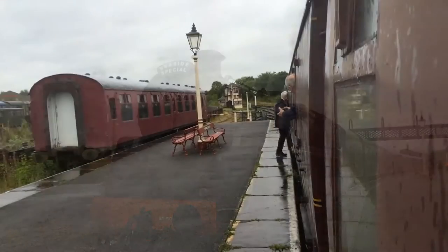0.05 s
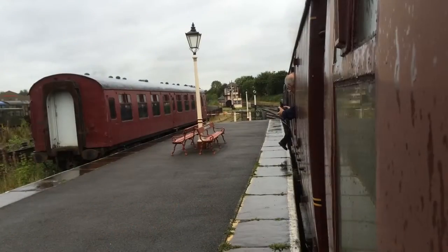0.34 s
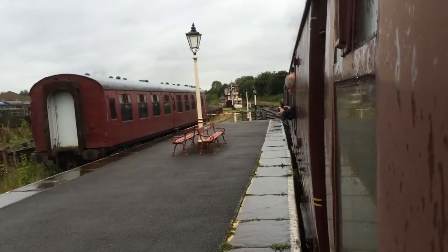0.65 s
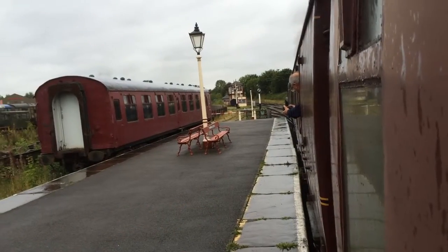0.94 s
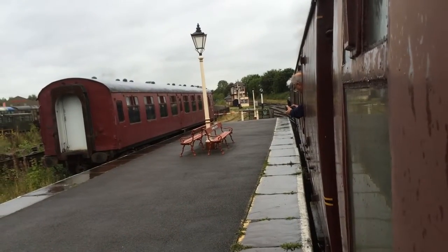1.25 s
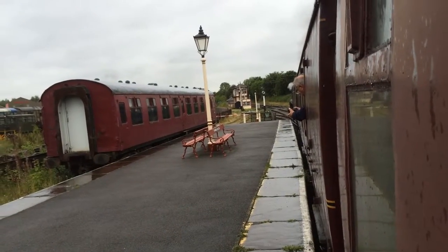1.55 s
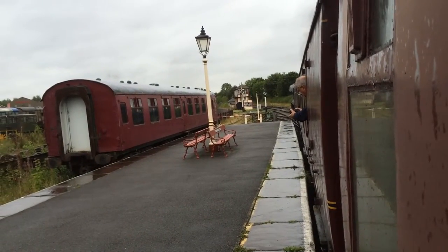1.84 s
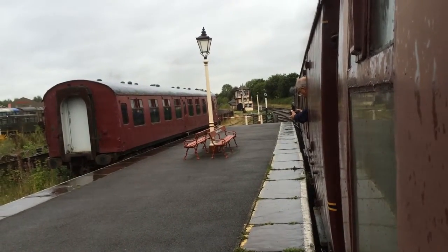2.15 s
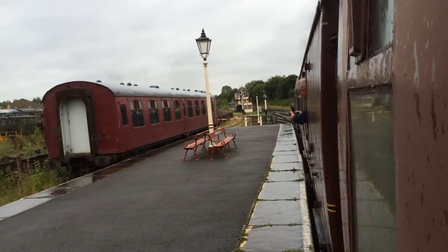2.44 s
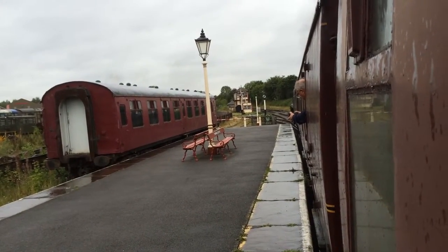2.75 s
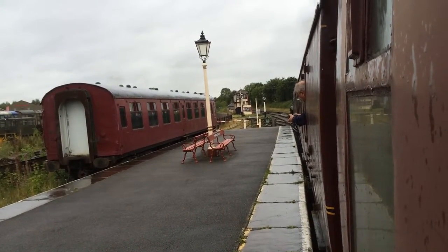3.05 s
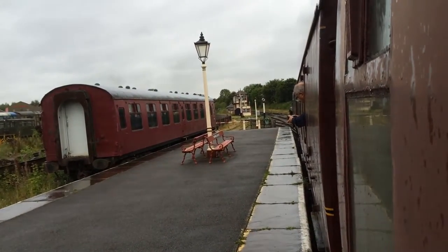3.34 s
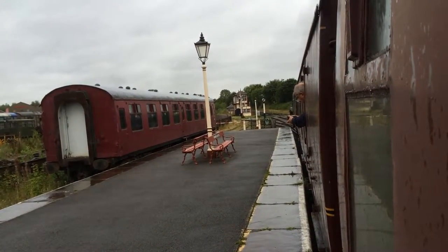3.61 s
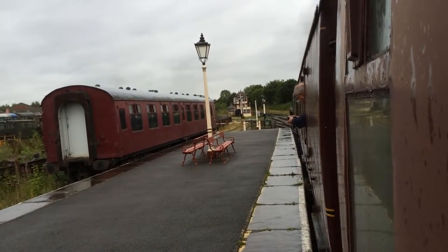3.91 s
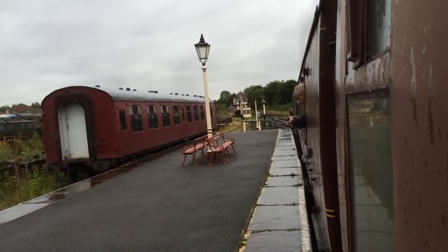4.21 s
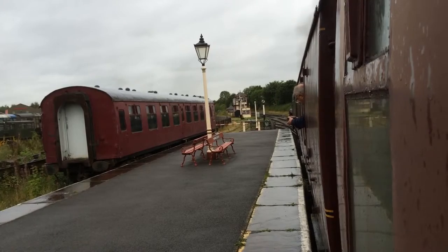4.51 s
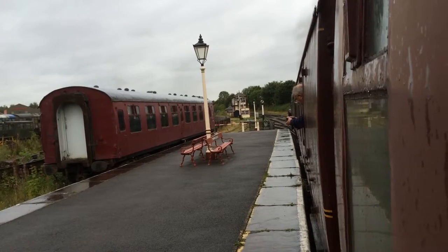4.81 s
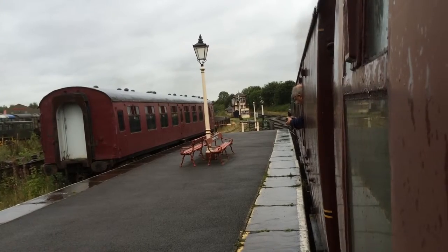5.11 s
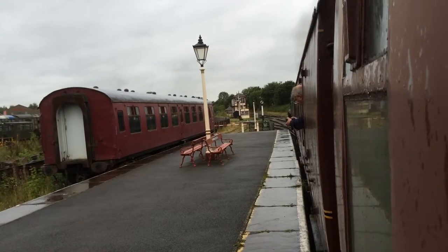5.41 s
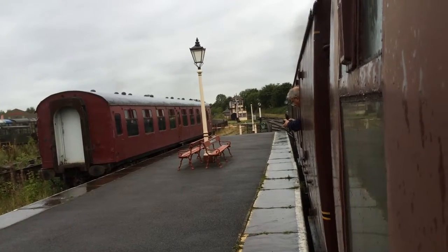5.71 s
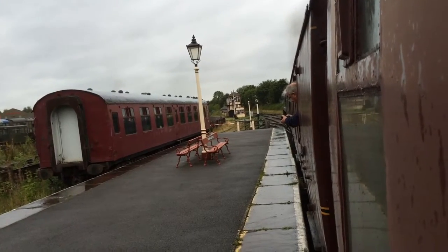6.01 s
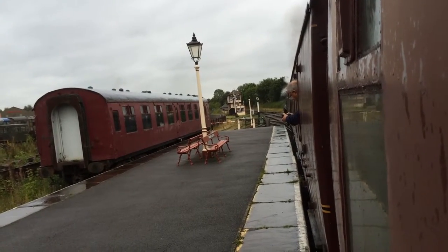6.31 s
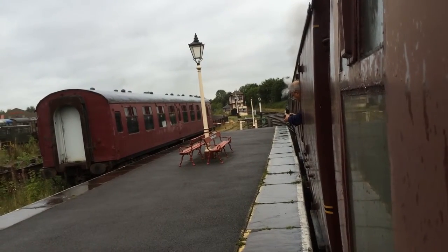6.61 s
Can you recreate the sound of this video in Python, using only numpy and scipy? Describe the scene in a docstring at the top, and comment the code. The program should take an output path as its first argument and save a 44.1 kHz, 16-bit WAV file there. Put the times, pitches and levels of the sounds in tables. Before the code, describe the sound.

A steam locomotive roars and hisses close by, cutting off abruptly at about 0.3 seconds. A quieter, more distant engine remains, with a soft hollow roar and a steady hiss of leaking steam that carries faint, thin singing tones. At about 0.8 seconds comes the loudest sound, one short steam whistle that rises in pitch, turns harsher and stops at 1.2 seconds. It echoes around the yard and fades over the next second or two. Two faint whistling notes follow at about 2.3 and 2.9 seconds. Wind bumps the microphone with dull thuds near 2.8 and 4.3 seconds, and more strongly at 5 seconds. At about 5.2 seconds the engine's drain valves open and steam blasts out in a loud hiss, swelling at 6 seconds and continuing to the end, just short of 7 seconds. Everything is heard in mono from the platform.

```python
"""A steam locomotive roars close by for a moment, then stands far off at the end of its train.
Its blower rings the chimney; leaking steam hisses and sings. One short whistle rises, overblows as
pressure builds, and echoes round the yard. Wind thumps the microphone a few times. Last, the cylinder
drain cocks open: steam blasts through their pipes in a long, loud hiss. Mono, from the platform."""
import sys
import numpy as np
from scipy import signal
from scipy.fft import rfft, irfft, next_fast_len
from scipy.io import wavfile
from scipy.ndimage import uniform_filter1d, minimum_filter1d, map_coordinates

SR = 44100
rng = np.random.default_rng(int(sys.argv[2]) if len(sys.argv) > 2 else 0)


def file_out(sig):
    """Save sig as 16-bit WAV at sys.argv[1]."""
    # one column per channel
    cols = np.atleast_2d(sig).T
    # limit, then scale
    lim = np.clip(cols, -1, 1)
    pcm = np.round(lim * 32767).astype(np.int16)
    wavfile.write(sys.argv[1], SR, pcm)


N = 293706
TIME_S = np.arange(N) / SR
FREQS_HZ = np.maximum(np.fft.rfftfreq(N, 1 / SR), 1)

# whistle's first, second, higher modes: level before swell/dB, level overblown/dB
WHISTLE_REGISTERS = [(-6.5, -10.5), (-38, -21), (-39.5, -22.5)]
# higher modes: harmonic number, relative level/dB, breathiness/0-1
WHISTLE_OVERTONES = [(3, -1.5, 0.07), (4, -13.5, 0.6), (5, -12.5, 0.6), (6, -19, .85)]
# whistle's steam noise: f/Hz, level/dB
BREATH_SPECTRUM = [(400, -37), (750, -2), (1100, -1.5), (1700, -15), (3000, -16), (8000, -26)]
# steam through the shut whistle: t/s, half length/s, peak f/Hz, level/dB
WHISTLE_TRICKLES = [(2.251, 0.127, 1720, -35.5), (2.948, 0.059, 1670, -39.5)]
# reflections off carriages; off buildings and wooded hill: delay/s, level/dB
CARRIAGE_ECHOES = [(.046, -8), (.075, -11)]
YARD_ECHOES = [(.085, -12.5), (0.229, -19), (.33, -22), (.555, -20), (.83, -35.5)]
# noise of drain cocks, close engine, leak, yard: f/Hz, relative density/dB
COCK_SPECTRUM = [(180, -25), (300, -16), (390, -66), (452, -10.5), (515, -21), (568, -11), (855, -17.5),
                 (1090, -10.5), (1590, -5.5), (1970, -4.5), (2280, -5.5), (3550, -3), (9960, -11.5),
                 (12900, -16.5), (15000, -27)]
CLOSE_SPECTRUM = [(18, -47), (30, -9), (113, -18), (195, -7), (312, -7), (645, -14), (774, -7),
                  (1090, -10.5), (1240, 0), (1440, -15), (2130, -8.5), (2430, -16), (3590, -9),
                  (15000, -16)]
LEAK_SPECTRUM = [(400, -17.5), (650, -7), (1000, -6), (1500, 4), (2300, -3.5), (3400, 0.5), (5500, 3),
                 (6200, 2), (7200, 2), (8700, 2), (10500, -2.5), (12500, -2), (13500, -7.5), (15500, -13)]
YARD_SPECTRUM = [(20, -28), (40, -12), (62, 0), (110, -4), (250, -15), (450, -6.5), (700, -19),
                 (2000, -28.5)]
# resonances of drain pipes, close engine, chimney: f/Hz, nominal width/Hz, level/dB
DRAIN_PIPE_MODES = [(569, 20, 0), (733, 126, -4), (972, 40, -0.5), (1122, 110, 4), (1360, 99, -1),
                    (1873, 18, 11.5), (1940, 31, 7), (2047, 46, 7), (2570, 19, 4), (2630, 22, -14),
                    (2685, 15, 10.5), (3520, 30, 2), (3960, 16, 5)]
CLOSE_ENGINE_MODES = [(201.5, 35, 3), (803, 65, -3), (1265, 100, 3), (1725, 66, -3.5), (2150, 61, -3),
                      (3560, 140, -13)]
CHIMNEY_MODES = [(197, 48.4, 3), (335.7, 47, -5.5), (786, 41, -4), (971, 78, -3), (1274, 100, 5),
                 (1707, 73, -2.5)]
# narrow peaks colouring the leak's hiss, as from a nearby reflection: f/Hz, nominal width/Hz, level/dB
HISS_PEAKS = [(2570, 46, -6), (2848, 41, 4), (3174, 51, 3), (3546, 170, 1.5), (3930, 27, 0.5),
              (4293, 49, 5), (4540, 25, 7.5), (4914, 76, 9), (5080, 47, 4), (6870, 69, 3), (8800, 240, -3),
              (12070, 610, -5)]
# singing of the leak: t/s, length/s, starting f/Hz, glide/(Hz/s), level/dB
LEAK_JET_SPELLS = [(.03, 0.86, 4980, -0.5, -43), (1.299, 2, 7490, 259, -38), (2.601, 2.7, 5010, 85, -39),
                   (4.35, .85, 7600, 0, -43)]
# wind eddies: t/s, level/dB, rise/s, decay/s, centre f/Hz
WIND_EDDIES = [(2.785, -27.5, 0.028, 0.029, 58.7), (2.85, -34.5, 0.052, 0.065, 100),
               (4.32, -34, 0.082, .11, 106), (5.015, -23, 0.024, 0.048, 100),
               (5.044, -20, .008, 0.025, 117), (5.19, -34, 0.073, 0.072, 85)]


def whistle(open_s=0.837, shut_s=1.187, half_pressure_s=0.095, low_hz=785, full_hz=860):
    """Pressure sharpens and overblows the bell; it sags and spits on shutting. Returns near, carried."""
    swell_db, flutter_db = 16, 2
    overblow_pressure, overblow_width, jump_share = 0.443, 0.042, 0.21
    filling = (np.maximum(TIME_S - open_s, 0) / half_pressure_s) ** 3.51
    pressure = filling / (1 + filling) * dying(shut_s, decay_s=0.025)
    sounding = ramp(open_s, length_s=0.0194) * dying(shut_s + 0.016, decay_s=0.016)
    overblown = 0.5 + 0.5 * np.tanh((pressure - overblow_pressure) / (2 * overblow_width))
    hz = low_hz + (full_hz - low_hz) * ((1 - jump_share) * pressure + jump_share * overblown)
    # overblown modes compete and flutter
    first_db, second_db, higher_db = (
        (1 - overblown) * (soft_db + swell_db * pressure)
        + overblown * (hard_db + flutter_db * walk(44.96))
        for soft_db, hard_db in WHISTLE_REGISTERS)
    phase = 2 * np.pi * np.cumsum(hz * (1 + 0.003 * overblown * walk(140))) / SR
    tone = undb(first_db) * np.sin(phase) + undb(second_db + 2.5 * walk(108.6)) * np.sin(2 * phase)
    for k, db, breath in WHISTLE_OVERTONES:
        pure = np.sqrt(1 - breath ** 2) * np.sin(k * phase)
        breathy = breath * band(k * hz, width_hz=110) / np.sqrt(2)
        tone += undb(higher_db + db + 1.2 * walk(90)) * (pure + breathy)
    steam = undb(-22.5) * pressure * rush(BREATH_SPECTRUM)
    spit = undb(-22.5) * pulse(1.191, half_s=0.0083) * np.sin(2 * np.pi * 3440 * TIME_S)
    near = sounding * (np.sqrt(2) * tone + steam) + spit
    held = uniform_filter1d(pressure ** 4, size=1300)  # broad, distant faces blur the note's ends
    fading = undb(-16 + 5.9 * walk(50.06))  # moving air: overtones come and go
    carried = undb(-1.5) * held * (np.sin(phase) + fading * (np.sin(2 * phase) + np.sin(3 * phase)))
    return near, carried


def whistle_echoes(near, carried, t60_s=3, build_s=0.18, wet_db=-21):
    """Carriages answer at once; buildings and hill return the carried note over a scattered tail."""
    tail = rng.standard_normal(N) * undb(-60 * TIME_S / t60_s) * np.minimum(TIME_S / build_s, 1)
    scattered = signal.fftconvolve(carried, tail / np.sqrt(np.sum(tail ** 2)))[:N]
    early = sum(undb(db) * delay(near, s) for s, db in CARRIAGE_ECHOES)
    late = sum(undb(db) * delay(carried, s) for s, db in YARD_ECHOES)
    return early + late + undb(wet_db) * scattered


def whistle_trickles(sag_hz=50):
    """Leaking steam sounds the shut whistle's second mode, sharpest at peak flow."""
    out = np.zeros(N)
    for at_s, half_s, peak_hz, db in WHISTLE_TRICKLES:
        flow = pulse(at_s, half_s)
        hz = peak_hz - sag_hz * (1 - flow)
        phase = 2 * np.pi * np.cumsum(hz * (1 + 0.0045 * walk(80))) / SR
        out += np.sqrt(2) * flow * undb(db + 2.4 * walk(41.5)) * np.sin(phase)
    return out


def drain_cocks(open_s=5.243, surge_s=5.99, hiss_db=-21, roar_db=-29.5):
    """The pipes hoot as they clear; steam blasts through and surges once as pressure rises."""
    opening = ramp(open_s, length_s=0.062)
    surge = ramp(surge_s, length_s=0.2)
    hiss = undb(hiss_db + 1.7 * surge + 0.24 * walk(30)) * rush(COCK_SPECTRUM)
    roar = undb(roar_db + 4.5 * surge + 1.1 * walk(12)) * ring(DRAIN_PIPE_MODES)
    hoot = undb(-31) * pulse(5.256, half_s=0.013) * np.sin(2 * np.pi * 578 * TIME_S)
    return opening * (shimmer(hiss, depth_db=1.9, span_s=0.2943, span_hz=110.9) + roar) + hoot


def close_engine(end_s=0.267, fade_s=0.0063):
    """Blower roar from close by, with a short steam squeal; ends abruptly."""
    fade = np.clip((end_s - TIME_S) / fade_s + 0.5, 0, 1)
    squeal = undb(-29) * pulse(0.165, half_s=0.035) * band(np.full(N, 2155.), width_hz=14)
    return fade * (undb(-23.5) * rush(CLOSE_SPECTRUM) + undb(-24.5) * ring(CLOSE_ENGINE_MODES) + squeal)


def blower(level_db=-34.5):
    """The blower's turbulence rings chimney and smokebox."""
    return undb(level_db + 0.8 * walk(7.1)) * ring(CHIMNEY_MODES)


def steam_leak(level_db=-31.5, ease_s=2.84, ease_db=-1.23):
    """Escaping steam sputters and hisses, coloured by narrow peaks; it eases once."""
    flow = undb(level_db + ease_db * ramp(ease_s, length_s=0.78) + 0.6 * walk(90))
    hiss = flow * (rush(LEAK_SPECTRUM) + undb(-6) * ring(HISS_PEAKS))
    return shimmer(hiss + leak_jet(), depth_db=1.5, span_s=0.495, span_hz=130.2)


def leak_jet(rise_s=0.13, fall_s=0.21):
    """The leak sings in spells: one band each, swelling, gliding, fading."""
    out = np.zeros(N)
    for at_s, length_s, hz, glide_hz_per_s, db in LEAK_JET_SPELLS:
        envelope = undb(db + walk(24.97)) * ramp(at_s, rise_s) * dying(at_s + length_s, fall_s)
        out += envelope * band(hz + glide_hz_per_s * (TIME_S - at_s), width_hz=190)
    return out


def wind_buffets(q=2.6, low_hz=30, top_hz=520):
    """Each eddy swells and dies as a dull thud."""
    out = np.zeros(N)
    rolloff = (1 + (FREQS_HZ / top_hz) ** 2) * (1 + (low_hz / FREQS_HZ) ** 2)
    for at_s, db, rise_s, decay_s, hz in WIND_EDDIES:
        swell = np.exp(-np.maximum((at_s - TIME_S) / rise_s, 0) ** 2) * dying(at_s, decay_s)
        colour = 1 / np.hypot(1, q * (FREQS_HZ / hz - hz / FREQS_HZ))
        out += undb(db) * swell * noise(colour / rolloff)
    return out


def yard_rumble(level_db=-47):
    """Faint, wavering low background."""
    return undb(level_db + 1.5 * walk(4.84)) * rush(YARD_SPECTRUM)


def shimmer(x, depth_db, span_s, span_hz):
    """Moving air swells and fades narrow strips of a hiss independently."""
    f_hz, t_s, spectra = signal.stft(x, SR, nperseg=1024)
    field = rng.standard_normal((256, 256))
    grid = np.meshgrid(f_hz / span_hz, t_s / span_s, indexing="ij")
    strips = map_coordinates(field, grid, order=2, mode="wrap")
    return signal.istft(spectra * undb(depth_db * strips), SR)[1][:N]


def rush(spectrum):
    """Turbulence with a smooth spectrum."""
    hz, db = np.transpose(spectrum)
    return noise(undb(np.interp(np.log(FREQS_HZ), np.log(hz), db)))


def ring(peaks):
    """Turbulence with steep-sided spectral peaks."""
    return noise(sum(undb(db) / (1 + ((FREQS_HZ / hz - hz / FREQS_HZ) * hz / width * 0.95) ** 2)
                     for hz, width, db in peaks))


def band(hz, width_hz):
    """Narrow noise round a moving centre."""
    lowpass = 1 / (1 + (FREQS_HZ / width_hz) ** 2)
    phase = 2 * np.pi * np.cumsum(hz) / SR
    return noise(lowpass) * np.cos(phase) + noise(lowpass) * np.sin(phase)


def noise(gain):
    """Noise shaped by gain over FREQS_HZ; rms 1."""
    size = next_fast_len(N, True)
    gain = np.interp(np.fft.rfftfreq(size, 1 / SR), FREQS_HZ, gain)
    x = irfft(rfft(rng.standard_normal(size)) * gain, size)[:N]
    return x / np.sqrt(np.mean(x ** 2))


def walk(rate_hz):
    """Random steps, smoothed twice; spread near 1."""
    hold = int(SR / rate_hz)
    steps = np.repeat(rng.standard_normal(N // 20)[:N // hold + 1], hold)
    return 1.52 * uniform_filter1d(uniform_filter1d(steps, hold), hold)[:N]


def ramp(start_s, length_s):
    """Linear rise from 0, holding at 1."""
    return np.clip((TIME_S - start_s) / length_s, 0, 1)


def dying(end_s, decay_s):
    """1 until end_s, then exponential decay."""
    return np.exp(-np.maximum(TIME_S - end_s, 0) / decay_s)


def pulse(at_s, half_s):
    """Gaussian swell, peak 1."""
    return np.exp(-((TIME_S - at_s) / half_s) ** 2)


def delay(x, delay_s):
    """The same sound, later."""
    return np.interp(TIME_S - delay_s, TIME_S, x, left=0)


def undb(db):
    """Decibels to gain."""
    return 10 ** (np.asarray(db) / 20)


def gain_control(x, threshold_db=-11, slope=0.62, hold_s=0.24, release_s=0.11):
    """Loud sound cuts the gain at once; it holds, then recovers."""
    level_db = 10 * np.log10(np.maximum(uniform_filter1d(x[0] ** 2, size=400), 1e-12))
    cut_db = np.minimum(threshold_db - level_db, 0) * slope
    half = int(hold_s * SR / 2)
    held_db = minimum_filter1d(cut_db, 2 * half + 1, origin=half)
    pole = np.exp(-1 / (release_s * SR))
    released_db = signal.lfilter([1 - pole], [1, -pole], held_db)
    return x * undb(np.minimum(held_db, released_db))


def scene():
    """All sources straight ahead; identical channels."""
    near, carried = whistle()
    mix = near + whistle_echoes(near, carried) + whistle_trickles()
    mix += blower() + steam_leak() + yard_rumble() + close_engine() + drain_cocks() + wind_buffets()
    return np.array([mix, mix])


def record(dry):
    """Automatic gain, then a steep low-pass at 15.3 kHz."""
    lowpass = signal.ellip(10, 0.2, 80, 15300, fs=SR, output="sos")
    return signal.sosfilt(lowpass, gain_control(dry))


dry = scene()
out = record(dry)
file_out(out)
```